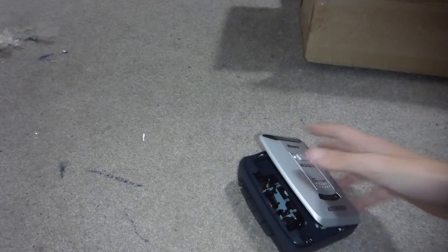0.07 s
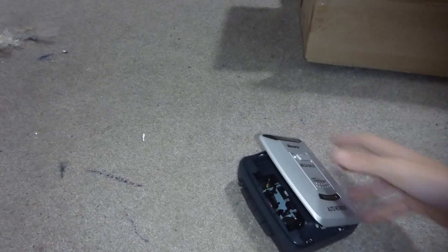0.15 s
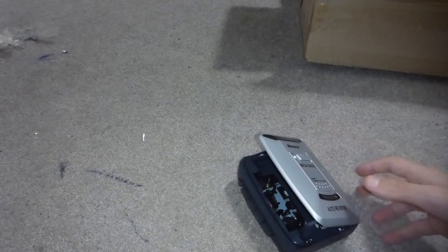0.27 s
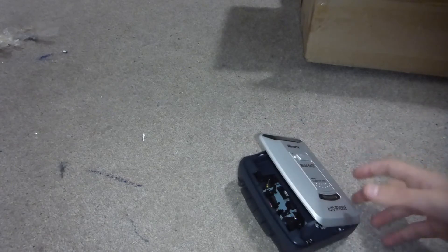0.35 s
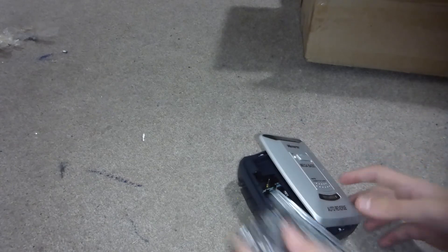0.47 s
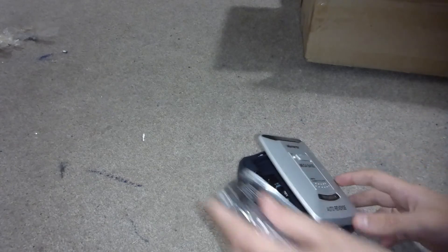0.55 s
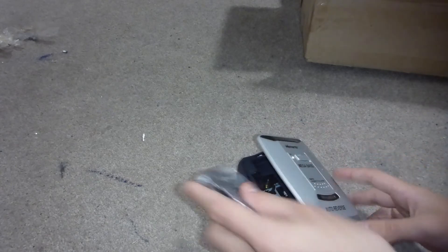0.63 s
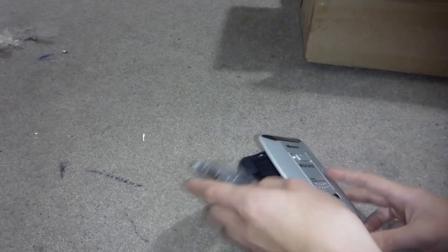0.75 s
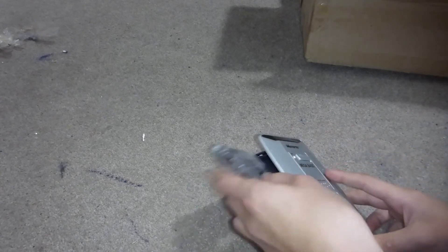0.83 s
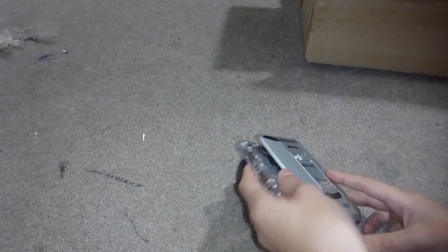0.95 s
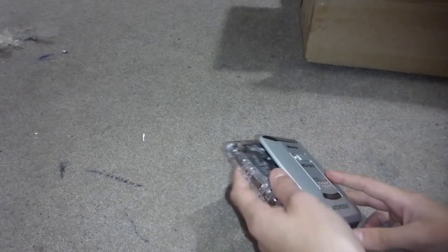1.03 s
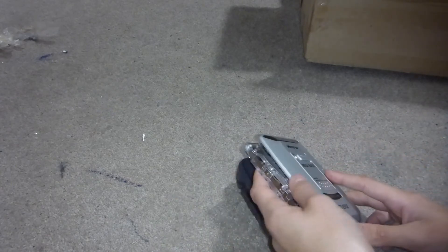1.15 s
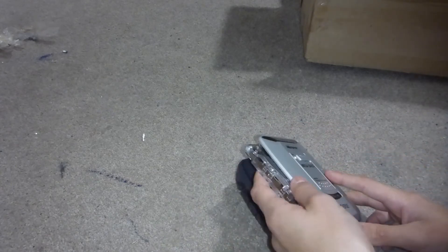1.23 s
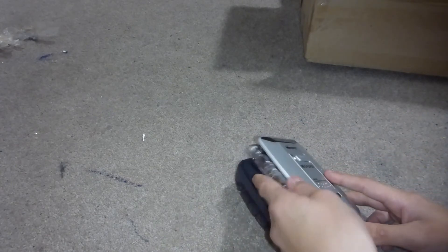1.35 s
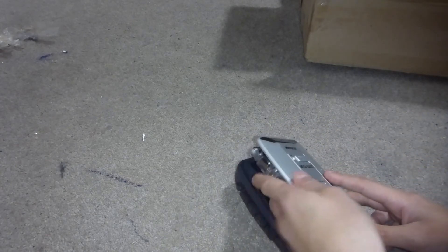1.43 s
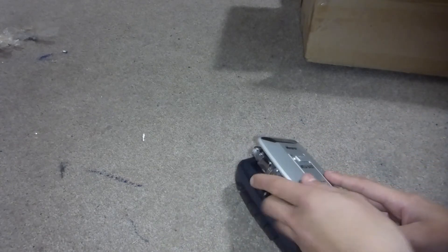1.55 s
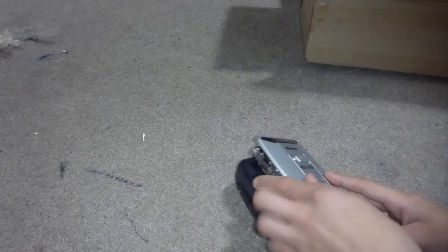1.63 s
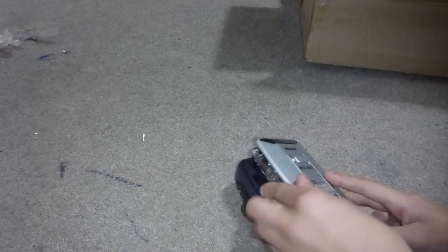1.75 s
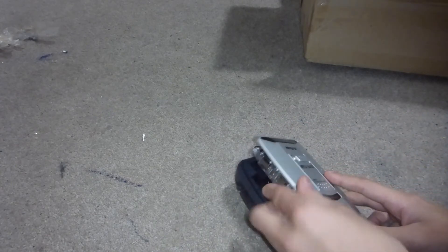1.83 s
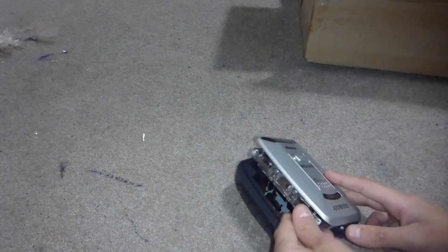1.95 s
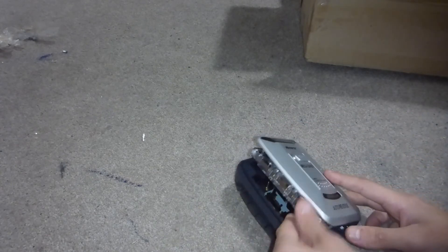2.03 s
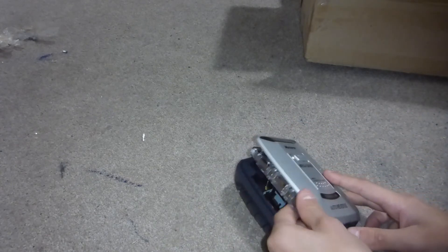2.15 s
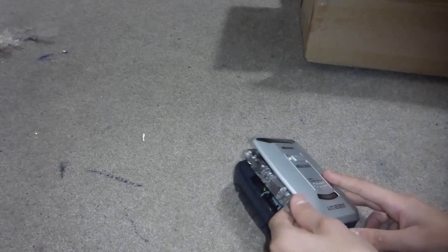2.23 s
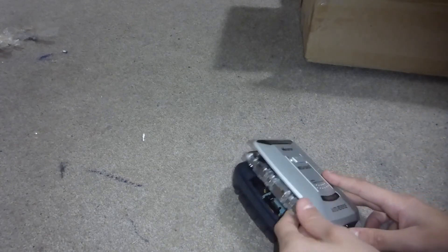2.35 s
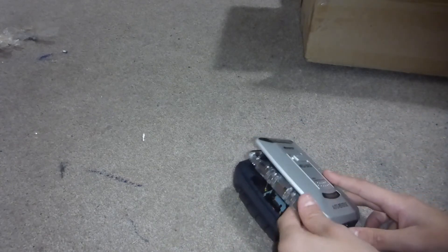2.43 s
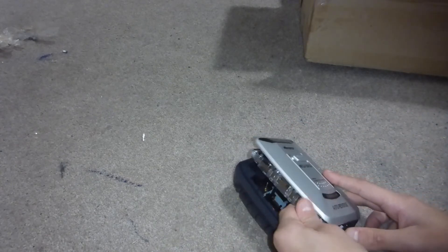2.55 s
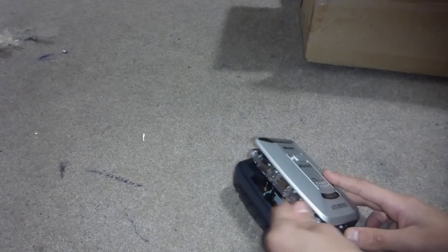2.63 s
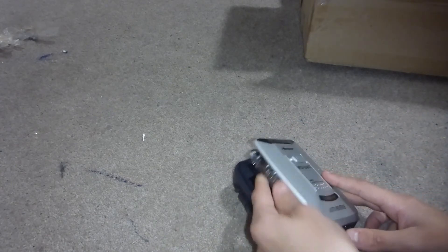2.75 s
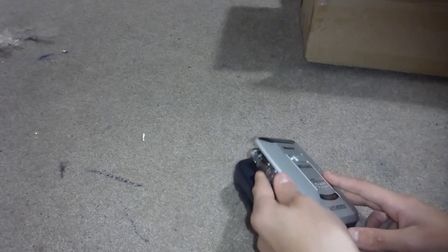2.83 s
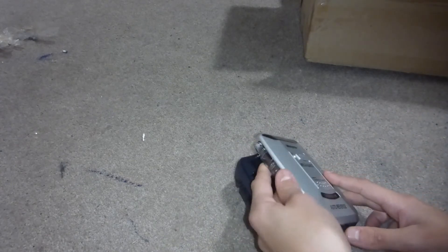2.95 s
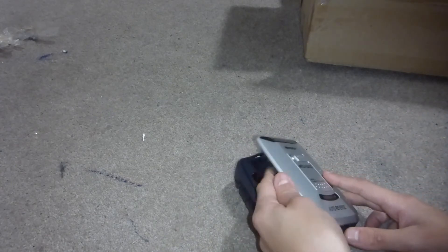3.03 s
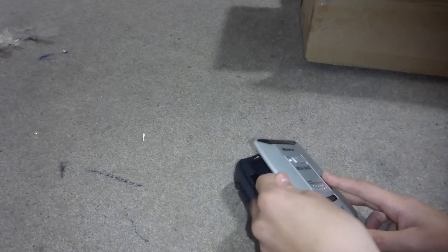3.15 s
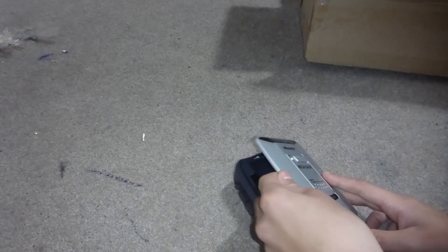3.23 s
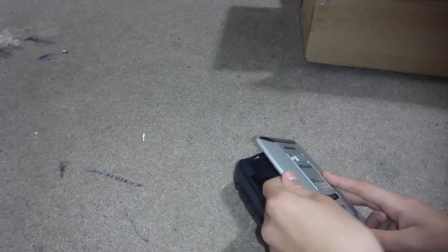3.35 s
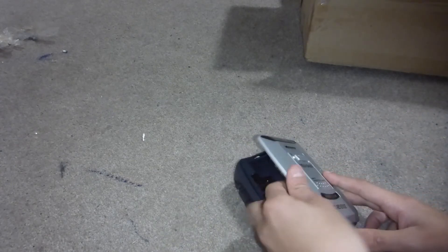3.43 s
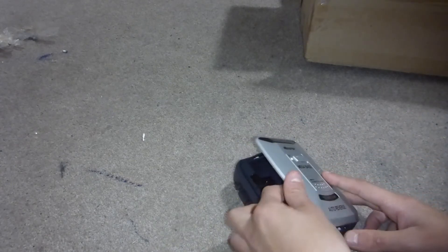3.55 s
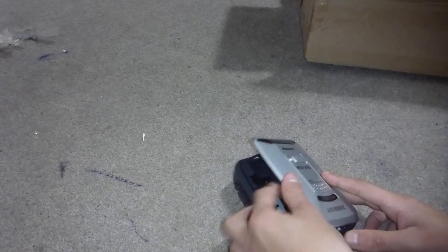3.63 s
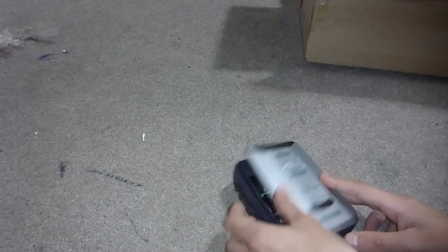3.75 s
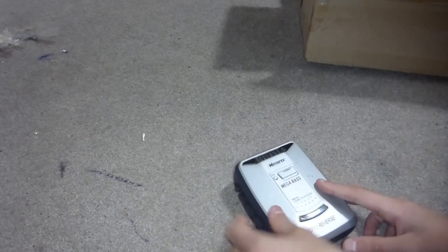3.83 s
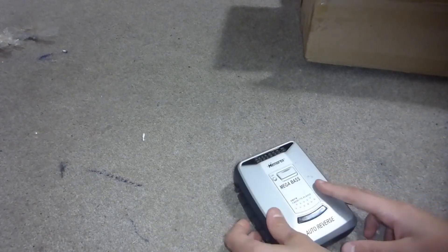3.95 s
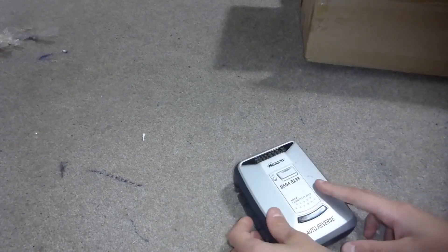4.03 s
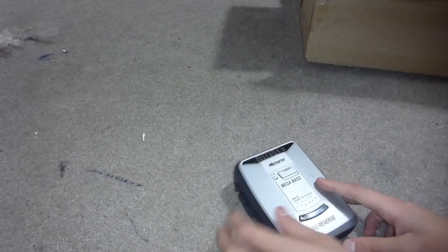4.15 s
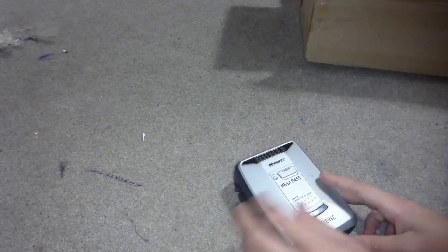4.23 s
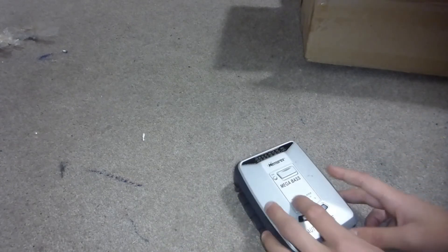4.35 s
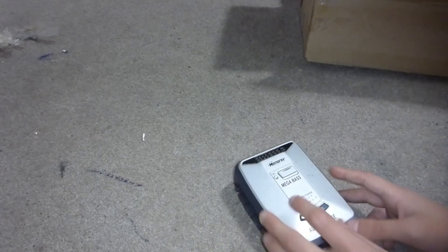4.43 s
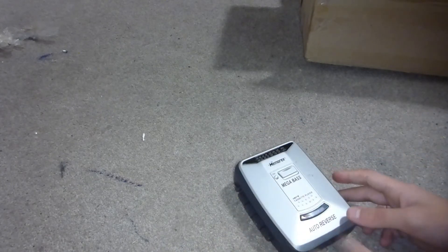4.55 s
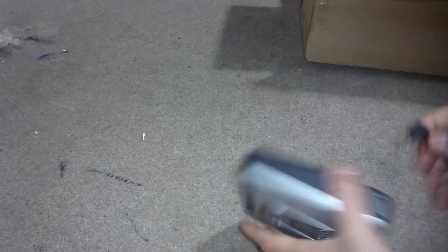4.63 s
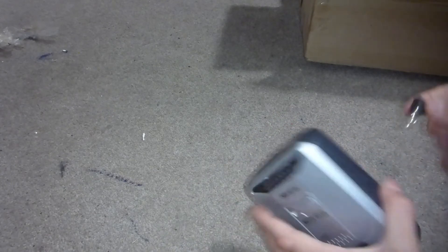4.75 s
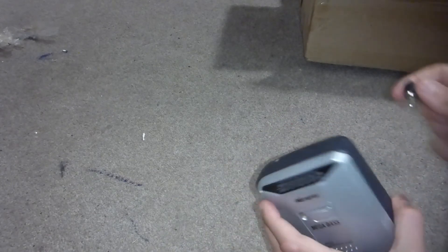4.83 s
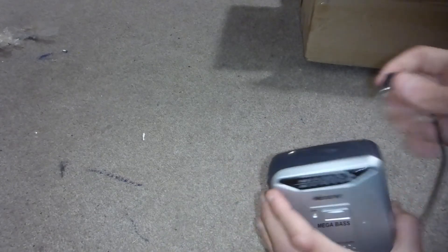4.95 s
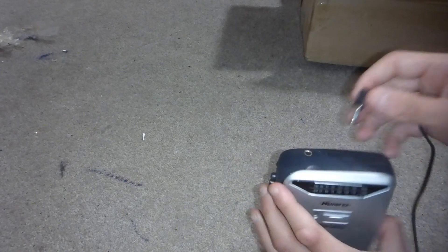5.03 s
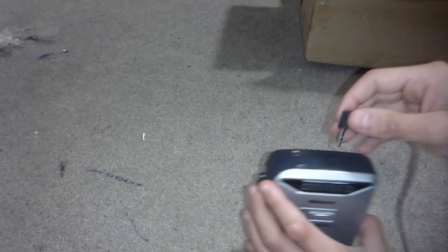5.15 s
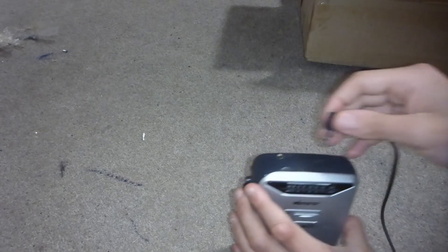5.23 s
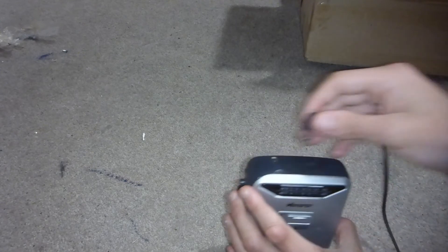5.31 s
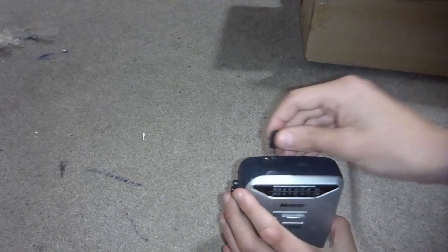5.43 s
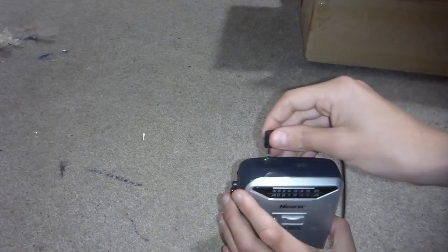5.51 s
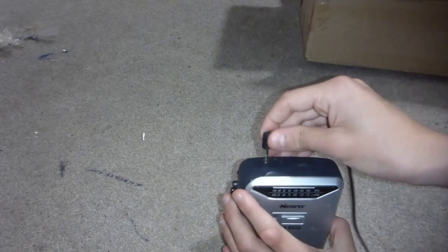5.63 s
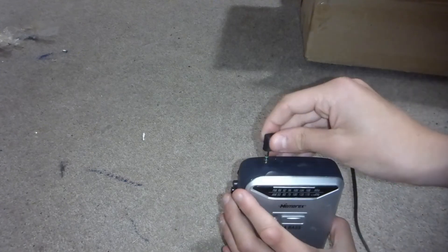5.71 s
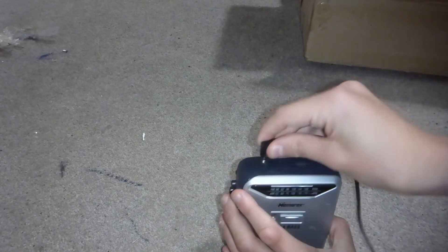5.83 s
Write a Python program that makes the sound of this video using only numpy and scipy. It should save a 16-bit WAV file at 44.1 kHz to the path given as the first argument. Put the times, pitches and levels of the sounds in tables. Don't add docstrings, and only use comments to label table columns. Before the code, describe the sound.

A hollow plastic gadget knocks, rattles and snaps close up in a small quiet room, ending with small sharp plug clicks.

```python
import sys
import numpy as np
from scipy import signal
from scipy.fft import rfft, irfft, next_fast_len
from scipy.io import wavfile
from scipy.ndimage import uniform_filter1d

SR = 44100
rng = np.random.default_rng(int(sys.argv[2]) if len(sys.argv) > 2 else 0)


def transcribe(u):
    v = np.clip(np.atleast_2d(u).T, -1, 1)
    q = np.round(v * 32767).astype(np.int16)
    wavfile.write(sys.argv[1], SR, q)


def rack_gain(trim_db):
    fader = np.asarray(trim_db, float)
    return 10 ** (fader / 20)


N = 259087


def evened(x):
    return x / np.sqrt(np.mean(x ** 2) + 1e-20)


def peaked(x):
    return x / abs(x).max()


def read(points, hz):
    f, value = np.transpose(points)
    return np.interp(np.log(hz + 1), np.log(f + 1), value)


def causal(gain_db_of, size=4096):
    gain_db = gain_db_of(abs(np.fft.fftfreq(size, 1 / SR)))
    log_gain = np.log(rack_gain(np.maximum(gain_db, -100)))
    return np.fft.ifft(np.exp(np.conj(signal.hilbert(log_gain)))).real[:size // 2]


def add(mix, s, sound):
    part = mix[round(s * SR):][:len(sound)]
    part += sound[:len(part)]


def ring(modes, t, luck, damping):
    hz, db, t60 = np.transpose(modes)[:, :, None]
    fading = rack_gain(db - 60 * t / (t60 * damping))
    return (luck[:, None] * fading * np.sin(2 * np.pi * hz * t)).sum(0)


def noise(points, same, lead=lambda hz: 0 * hz):
    frames, hz = N // 256 + 5, np.fft.rfftfreq(1024, 1 / SR)
    a, b, c, d, patches = rng.standard_normal((frames, 513, 5)).T
    patches = evened(uniform_filter1d(uniform_filter1d(patches, 14, 0), 10, 1))
    same = np.clip(same(hz), -1, 1)[:, None]
    late = np.exp(-1j * lead(hz))[:, None]
    left, other = a + 1j * b, c + 1j * d
    right = same * late * left + np.sqrt(1 - same ** 2) * other
    z = np.array([left, right]) * rack_gain(read(points, hz)[:, None] + 2.5 * patches)
    return evened(signal.istft(z, nperseg=1024, noverlap=768)[1][:, :N])


def camera_floor():
    # f/Hz, level/dB per Hz
    colour = [(25, -21), (140, -1), (430, -5), (1000, -3), (2100, -11.5), (4700, -20), (5800, -19),
              (7000, -30), (8600, -29), (9050, -55.5), (9600, -27), (14900, -37.5), (15500, -60.5)]
    # f/Hz, likeness (0 to 1)
    likeness = [(60, 0.3), (400, 0.4), (1200, 0.8), (2600, 0.35), (5600, .7), (9000, 0.45)]
    # f/Hz, lead/radians
    left_lead = [(330, -.2), (560, -3), (2000, -3.2), (2900, -5.3), (3600, -6.1), (15900, -6.2)]
    return rack_gain(-58) * noise(colour, lambda hz: read(likeness, hz), lambda hz: read(left_lead, hz))


def room(x):
    # f/Hz, time to fall by 60 dB/s
    echo_time = [(200, 0.34), (600, 0.13), (1700, 0.18), (4500, 0.16), (10000, 0.18)]
    turn, out = np.cumsum(np.ones(N)) * 2.3 / SR, 0
    for k in range(3):
        taps = np.zeros((3, SR // 2))
        at = np.arange(120, SR // 2 - 20, 20) + rng.integers(0, 20, (3, (SR // 2 - 121) // 20))
        np.put_along_axis(taps, at, rng.choice([-1., 1.], at.shape), 1)
        hz, t, z = signal.stft(taps[:1] + 0.9 * taps[1:], SR, nperseg=256)
        fading = rack_gain(-60 * t / read(echo_time, hz)[:, None])
        tail = signal.istft(z * fading, SR, nperseg=256)[1]
        tail = tail / np.linalg.norm(tail[0])
        share = np.sqrt(2 / 3) * np.cos(np.pi * (turn + k / 3))
        out = out + signal.fftconvolve((x * share)[None], tail, axes=1)[:, :N]
    return out


def rubbing():
    # t/s, level/dB
    pressure = [(0, -60), (.28, -54), (.7, -62), (1.22, -48), (1.5, -70), (1.75, -62.5), (2.5, -68),
                (3.14, -56), (3.36, -69.5), (3.5, -58.5), (3.62, -73), (3.76, -57), (4.05, -74),
                (4.95, -64), (5.33, -71), (5.46, -54.5), (5.63, -72), (5.87, -63.5)]
    # f/Hz, level/dB
    rustle_colour = [(100, -24), (300, 2.5), (1000, 1), (3000, -1), (6000, -11.5), (8000, -22)]
    # t at the loudest/s, half length/s, level/dB
    glides = [
        (.4, .1, -73),
        (0.73, 0.054, -61.5),
        (1.14, 0.095, -68),
        (1.908, 0.2, -62.5),
        (2.78, .07, -88),
        (3.083, 0.14, -56),
    ]
    t = np.arange(N) / SR
    level_db = np.interp(t, *np.transpose(pressure))
    glide = sum(rack_gain(db) * np.exp(-((t - s) / half) ** 2) for s, half, db in glides)
    grain = rack_gain(2.0 * evened(uniform_filter1d(rng.standard_normal(N), 150)))
    rustle = noise(rustle_colour, lambda hz: 0.34 + 0 * hz) * grain * rack_gain(level_db)
    fizz = noise([(8000, -23.5), (9000, -9.5), (16000, -2.5)], lambda hz: .6 + 0 * hz)
    skin = rack_gain(-84.5 + .3 * (level_db + 59.0))
    return rustle + fizz * grain * (skin + glide)


def scrapes(rows):
    out = np.zeros(N)
    for s, half, db, hz in rows:
        t = np.arange(-.15, .15, 1 / SR)
        odds, size, fine = rng.random((3, len(t)))
        slip_now = odds < 4500 / SR
        slips = slip_now * rack_gain(-2.6 * np.log(size + 1e-4)) * np.sign(fine - .5)
        patch = signal.butter(1, [hz * 0.21, hz * 0.81], "band", fs=SR, output="sos")
        rung = evened(signal.sosfilt(patch, slips))
        add(out, s - .15, rack_gain(db) * rung * np.exp(-(t / half) ** 2))
    return out


def thuds():
    # t/s, peak level/dB
    pushes = [(0.838, -44), (1.038, -50), (1.165, -41.5), (1.44, -67.5), (2.007, -43), (2.266, -34.5),
              (2.51, -43), (2.954, -33.5), (3.035, -45), (3.176, -42.5), (3.844, -35.5), (3.866, -35.5),
              (4.375, -50), (5.853, -45.5)]
    # f/Hz, level/dB, time to fall by 60 dB/s
    low_modes = [(55, 3.5, 0.04), (168, 4, 0.046), (248, -2.5, 0.077)]
    t, out = np.arange(5000) / SR, np.zeros(N)
    for s, db in pushes:
        luck = 1 + 0.37 * rng.standard_normal(len(low_modes))
        push = ring(low_modes, t, luck, 0.63) * (1 - np.exp(-t / 0.0033))
        add(out, s, rack_gain(db) * peaked(push))
    return out


def ticks():
    # t/s, peak level/dB
    rattles = [(.3017, -42), (.3136, -52), (.3331, -39.5), (.5157, -23), (.8385, -31.5), (.9757, -29),
               (1.043, -26), (1.0934, -36), (1.1143, -53.5), (1.17, -13.5), (1.6072, -43), (2.2672, -25),
               (2.83, -38), (2.9527, -24), (2.974, -25.5), (3.041, -27.5), (3.8102, -38), (3.8421, -20)]
    # t/s, peak level/dB
    settling = [(.1336, -45.5), (.4478, -40.5), (.6719, -43), (1.208, -13.5), (1.4405, -11), (2.0053, -40),
                (2.0118, -39), (2.581, -34), (2.7307, -29), (2.7447, -24.5), (2.826, -28.5), (2.9517, -67),
                (3.1108, -45.5), (3.6941, -50.5), (3.7943, -51.5), (4.38, -64), (5.4909, -40),
                (5.5757, -52), (5.6999, -40), (5.8541, -46)]
    # t/s, peak level/dB
    snicks = [
        (1.1608, -9),
        (1.2466, -29.5),
        (1.3114, -22.5),
        (1.4277, -56),
        (2.2094, -33.5),
        (2.3171, -24),
        (2.331, -32),
        (2.5075, -30),
        (2.5113, -17),
        (2.52, -19),
    ]
    t, out = np.arange(5000) / SR, np.zeros(N)
    parts = [(rattles, 0.075), (settling, 0.044), (snicks, 0.027)]
    for s, db, t60 in sorted((*row, t60) for rows, t60 in parts for row in rows):
        burst = rng.standard_normal(len(t)) * rack_gain(db - 60 * t / np.clip(t60, .005, .2))
        add(out, s - .0007, burst * np.minimum(t / 0.0024, 1))
    return signal.sosfilt(signal.butter(4, 8200, "high", fs=SR, output="sos"), out)


def plates():
    # t/s, peak level/dB, f/Hz
    small_plates = [(0.3233, -38, 2030), (0.336, -30, 3420), (0.522, -29, 800), (0.367, -32.5, 1850),
                    (0.4131, -28.5, 2710), (0.481, -35, 2900), (0.4805, -29, 1790), (0.522, -12, 1400),
                    (0.5358, -25, 1500), (0.5436, -31, 2020), (0.5455, -25, 1440), (0.6302, -47, 2770),
                    (0.6688, -40.5, 3360), (0.6688, -39.5, 1440), (0.968, -19, 1480), (1.039, -31.5, 5250),
                    (1.0375, -31, 6250), (1.0394, -21, 2850), (1.0533, -29, 5080), (1.054, -28.5, 5460),
                    (1.053, -26.5, 2430), (1.0763, -28, 1550), (1.207, -28, 900), (1.0977, -40, 2100),
                    (1.1471, -31, 2580), (1.1475, -25, 1390), (1.16, -31, 4200), (1.169, -18, 950),
                    (1.168, -14, 1800), (1.169, -12.5, 1400), (1.205, -31, 6080), (1.2447, -35, 1810),
                    (1.2442, -32, 2910), (1.3092, -24.5, 3140), (1.4348, -36, 3850), (1.4352, -24, 3430),
                    (1.445, -29, 3900), (1.438, -20, 1000), (1.4485, -27, 1080), (1.468, -26, 1200),
                    (1.4815, -31, 1200), (1.487, -31, 1270), (1.503, -36, 1250), (1.51, -35, 1300),
                    (1.4613, -22.5, 2830), (1.4622, -19, 1230), (1.6085, -41, 3390), (1.666, -38, 2760),
                    (1.31, -25, 780), (1.9944, -36.5, 2040), (2.258, -43, 930), (2.2562, -39.5, 3330),
                    (2.2669, -19, 3550), (2.2668, -24.5, 4020), (2.2685, -12.5, 1090),
                    (2.5107, -47, 6200), (2.5763, -34, 3750), (2.746, -41, 2360), (2.7459, -33, 6500),
                   (2.7459, -28, 3195), (3.0415, -29, 1150), (2.8176, -38, 3550), (2.8176, -33, 2990),
                   (2.9531, -24.5, 880), (2.953, -20, 1480), (2.9543, -11.5, 3900), (2.512, -39, 720),
                   (2.9749, -44, 3420), (2.9749, -37, 3800), (3.883, -27, 700), (3.0655, -30, 4050),
                   (3.04, -26, 3230), (3.041, -32, 3930), (3.04, -29, 3650), (3.065, -33.5, 5370),
                   (2.5765, -40, 730), (3.1109, -40, 2250), (3.1763, -39.5, 1000), (3.7946, -31, 4320),
                   (3.845, -16.5, 2470), (3.846, -20, 3840), (3.845, -11, 888), (3.864, -26, 3380),
                   (3.8652, -25, 4510), (3.8638, -18.5, 3940), (3.906, -38, 4520), (3.9067, -28.5, 6050),
                   (3.907, -33, 5490), (4.3799, -35, 2396), (4.3795, -24.5, 3590), (4.6252, -36.5, 3360),
                   (4.6258, -30.5, 3030), (4.6261, -27, 2590), (4.841, -45, 4370), (4.841, -47, 3380),
                   (5.0947, -39.5, 848), (3.8685, -17, 1400), (5.3713, -43, 1600), (5.3714, -43.5, 3720),
                   (5.4922, -28.5, 1714), (5.4923, -35, 3290), (5.4916, -30, 2230), (5.493, -38, 720),
                   (5.5779, -33, 1730), (5.664, -40, 1770), (5.663, -35, 2210), (5.665, -39, 960),
                   (5.7015, -36, 1940), (5.7012, -41, 2440), (5.7015, -35, 2940), (5.8542, -29.5, 1980),
                   (5.8545, -29.5, 3670)]
    # t/s, peak level/dB, f/Hz
    snaps = [(.4131, -29, 2300), (.5206, -11, 1800), (.8392, -19, 5700), (.8392, -25, 4010),
             (.8392, -33, 3040), (.8395, -21, 1450), (.855, -40, 5500), (1.1608, -5.5, 1400),
             (1.1692, -10, 2200), (1.208, -18, 1600), (1.3092, -24, 2290), (2.9536, -17, 5680),
             (3.0455, -25, 480), (3.066, -25, 1050), (3.871, -21, 1100), (4.3795, -27, 4410),
             (2.9536, -17, 3830), (3.0425, -30, 3600), (4.6265, -32, 2250), (4.6262, -25, 3050),
             (4.6262, -31, 1920), (5.4925, -32, 1000), (5.4918, -24, 10500), (5.578, -31, 10600),
             (5.8505, -34, 3000), (5.695, -35, 2400), (5.7085, -40, 5000), (5.861, -30, 3600)]
    # t/s, peak level/dB
    tongue = [
        (2.3171, -36),
        (2.331, -40),
        (2.5075, -30),
        (2.5122, -19),
        (2.5208, -21),
        (2.5275, -31),
        (2.532, -36),
        (2.5365, -48),
    ]
    t, out = np.arange(3000) / SR, np.zeros(N)
    pings = [(*row, 9790) for row in tongue]
    kinds = [(small_plates, .02), (snaps, .008), (pings, .018)]
    for rows, t60 in kinds:
        for s, db, hz in rows:
            pair = ring([(hz, 0, 1), (hz * 1.05, -14, 1.5)], t, np.ones(2), t60 * (2000 / hz) ** .25)
            add(out, s - .0008, rack_gain(db) * pair * np.minimum(t / .001, 1))
    return out


def knocks():
    # f/Hz, level/dB, time to fall by 60 dB/s
    hollow_modes = [(328, -12, .08), (418, -3, .095), (484, -1.5, .095), (540, 0, .06)]
    # f/Hz, level/dB, time to fall by 60 dB/s
    wall_modes = [(720, 12.5, 0.0077), (980, 5.5, 0.041), (1070, -6.5, 0.02), (1390, 1.5, 0.051),
                  (1894, -0.5, 0.05), (2060, -1.5, 0.026), (3040, -2, 0.063), (3510, -9.5, 0.11),
                  (5296, -11, 0.0051), (5806, -7.5, 0.017)]
    # f/Hz, level/dB
    crack_colour = [(500, -30.5), (1300, -7), (2500, 2.5), (4000, -1), (6500, -11), (10000, -18),
                    (16000, -15)]
    # t/s, peak level/dB, panel f/Hz, hollow shell level against the peak/dB, time to fall by 60 dB/s
    edge_blows = [(0.335, -27.5, 1350, -28, 0.032), (0.5353, -28, 1950, -14, 0.03),
                  (0.5433, -23, 1450, -14, 0.0098), (0.9656, -13, 1000, -16, 0.024),
                  (1.0385, -15.5, 950, -5, 0.074), (1.0533, -18, 954, -6, 0.052),
                  (1.0977, -23.5, 1390, -24, 0.036), (1.16, -11.5, 1420, -17, 0.052),
                  (1.169, -2.5, 1460, -12, 0.017), (1.206, -12, 1400, -4, 0.026),
                  (1.4351, -15, 1010, -9.5, 0.066), (2.2668, -9.5, 2000, -5, 0.031),
                  (2.576, -21, 1016, -9, 0.014), (2.7464, -27.5, 3080, -4.5, 0.041),
                  (2.8176, -23.5, 1070, -6, 0.027), (3.04, -24, 1300, -0.5, 0.038),
                  (3.707, -24, 970, -4, 0.025), (3.8657, -5.5, 900, -4, 0.025),
                  (4.3795, -16.5, 846, 0, 0.022), (2.9534, -1.5, 3100, -20, 0.0087),
                  (5.4916, -17, 3600, -18, 0.014), (5.5777, -24.5, 3040, -15.5, 0.028),
                  (5.8545, -21.5, 3580, -11, 0.017), (5.86, -26, 2050, -3, 0.051)]
    # (t/s, level/dB, f/Hz, hollow level/dB, fall time/s)
    flat_blows = [(.366, -27, 2790, -20, .038), (0.414, -30.5, 1760, -32, 0.075),
                  (0.4805, -24, 1380, -18, 0.03), (0.5203, -7, 2100, -30, 0.012),
                  (0.8393, -11.5, 900, -5.5, 0.035), (1.0769, -15.5, 3590, -14, 0.021),
                  (1.1453, -27.5, 1036, -13, 0.076), (1.3091, -11.5, 1026, -12, 0.034),
                  (1.461, -17, 1400, -33, 0.03), (2.5106, -25.5, 2900, -1.5, 0.026),
                  (4.629, -23, 952, -12.5, 0.022), (3.065, -24, 3870, -7, 0.02),
                  (3.7949, -29, 1400, 3, 0.026), (3.846, 0, 1335, -7.5, 0.013),
                  (3.9072, -26, 1335, -8, 0.037)]
    # t/s, peak level/dB, panel f/Hz, hollow shell level/dB
    tape_taps = [(0.3237, -28, 1380, -7.5), (0.473, -35.5, 1920, -26), (0.6702, -38.5, 3340, -35),
                 (1.2438, -29, 1390, -17), (1.426, -22.5, 1100, -10.5), (1.4473, -31.5, 1100, -18),
                 (1.608, -33, 2530, -19), (1.9092, -44, 1080, 0), (1.9944, -34, 1990, 0.5),
                 (2.007, -33.5, 960, -9.5), (2.041, -34.5, 1124, -1.5), (2.2075, -35.5, 1020, -3.5),
                 (2.2562, -34, 3300, -18), (2.4584, -40, 2830, -7), (2.4973, -47, 1150, -5),
                 (2.519, -30, 1150, -14), (3.1111, -29.5, 1360, -1.5), (3.1772, -31, 1350, -9),
                 (3.212, -35.5, 970, 0)]
    # t/s, peak level/dB, panel f/Hz, hollow shell level/dB
    case_taps = [(3.4289, -39, 1040, -26), (3.5111, -38, 910, 0), (3.633, -50, 935, -9.5),
                 (3.9268, -30, 2380, -1.5), (4.574, -42, 1870, -7.5), (4.77, -39.5, 750, -1.5),
                 (4.826, -45, 1005, 0), (4.841, -34, 880, 3.5), (5.0947, -32.5, 940, -7),
                 (5.3714, -35.5, 2220, -7), (5.663, -31.5, 934, -10), (5.7012, -30, 2950, -9),
                 (5.7264, -31.5, 2060, -7.5)]
    # t/s, peak level/dB, panel f/Hz, hollow shell level/dB
    bumps = [(0.5585, -36, 1900, -9), (0.6306, -38.5, 1500, -21), (0.9334, -56, 520, 5),
             (.951, -29.5, 1530, 4.5), (1.2865, -42, 590, -10), (1.4637, -27, 1130, -31),
             (1.4785, -35, 1200, -20), (1.6674, -31, 3510, -13.5), (2.1345, -48.5, 2640, -9),
             (2.9648, -36, 2980, 0), (2.9738, -36, 3660, -0.5), (3.025, -42.5, 536, 1),
             (3.2763, -34, 988, -8.5), (3.4815, -40, 1385, 2.5), (3.6944, -35, 1126, -4.5),
             (4.2562, -49, 900, -14), (4.3906, -36, 900, 3), (4.738, -48.5, 886, -2),
             (4.8536, -46, 1715, -13), (4.926, -52, 950, 8), (4.97, -49.5, 1680, 0), (5.427, -45, 530, 0),
             (5.671, -35.5, 2130, -24)]
    t, out = np.arange(5000) / SR, np.zeros(N)
    blows = [(*row, -3) for row in edge_blows] + [(*row, -9.5) for row in flat_blows]
    blows += [(*row, 0.036, -3) for row in tape_taps]
    blows += [(*row, 0.027, -3.5) for row in case_taps]
    blows += [(*row, 0.07, -12) for row in bumps]
    for s, db, hz, hollow_db, t60, crack_db in sorted(blows):
        luck = rng.standard_normal(len(wall_modes + hollow_modes) + 1)
        grit = rng.standard_normal((2, len(t)))
        t60 = np.clip(t60, .006, .2)
        grip = t * (1 + 0.022 * luck[-1])

        swing = [(hz, 0, .35), (hz * 1.04, -9, 1.1), (hz * 1.1, -23, 2.6)]
        panel = ring(swing, t, np.ones(3), t60 * (1200 / hz) ** 0.089)

        near = rack_gain(-7.0 * abs(np.log2(np.transpose(wall_modes)[0] / hz)))
        wall_luck = (np.sign(luck) + 0.89 * luck)[:len(wall_modes)]
        walls = peaked(ring(wall_modes, grip, near * wall_luck, t60 / 0.044))

        hollow_luck = 1 + luck[len(wall_modes):-1] / 4
        hollow = peaked(ring(hollow_modes, grip, hollow_luck, .8 * t60 / .035))
        hollow *= 1 - np.exp(-t / 0.0017)

        chatter = rack_gain(2.0 * evened(uniform_filter1d(grit[1], 60)) - 6.0 - 60 * t / (1.54 * t60))
        burst = grit[0] * (rack_gain(-60 * t / (0.72 * t60)) + chatter)
        burst[50] += 6 * np.sign(luck[0])
        brighter = (1300 / hz) ** 0.16
        crack_taps = causal(lambda f: read(crack_colour, f * brighter), size=1024)
        crack = peaked(signal.fftconvolve(burst, crack_taps)[:len(t)])

        pitched = np.clip(1 - 0.38 * rack_gain(crack_db), .2, 1)
        blow = pitched * (0.67 * panel + 0.5 * walls) + rack_gain(hollow_db) * hollow + rack_gain(crack_db) * crack
        lead_in = crack * np.minimum(t / .003, 1)
        add(out, s - .004, rack_gain(db - 22) * lead_in)
        add(out, s - .0005, rack_gain(db) * blow * np.minimum(t / 0.00091, 1) ** 1.52)
    return out


def scene():
    # t at the loudest/s, half length/s, level/dB, upper reference f/Hz (the band
    catches = [(0.518, 0.012, -42.5, 2980), (0.952, 0.0037, -44, 1500), (1.053, 0.01, -26, 2790),
               (1.436, 0.02, -37.5, 1790), (1.674, 0.049, -54.5, 3420), (2.708, 0.028, -57, 3490),
               (2.971, 0.015, -41, 4500), (3.044, 0.0047, -40, 3650), (1.189, .03, -35.5, 2600),
               (3.058, 0.02, -49, 6000), (3.846, 0.0048, -21, 3263), (4.643, 0.015, -51.5, 3600),
               (5.184, 0.016, -61.5, 2400), (5.415, 0.064, -60.5, 2200), (5.701, 0.0096, -43, 3960)]
    # t at the loudest/s, half length/s, level/dB, upper #
    # reference f/Hz (the band runs from 0.21 to 0.81 of it)
    drags = [(.545, .025, -45, 2600), (.86, 0.019, -46, 6500), (1.08, .025, -42.5, 5000),
             (1.225, 0.029, -43, 5500), (1.49, 0.028, -45.5, 1490), (2.947, .005, -44, 3490),
             (3.81, .018, -47, 4000), (3.89, 0.032, -38.5, 6000), (4.39, 0.013, -47, 5500),
             (5.51, 0.019, -55.5, 5000), (5.59, .015, -53.5, 4000)]
    player = knocks() + thuds() + scrapes(catches) + ticks() + plates()
    return player + rack_gain(-8) * room(player) + rubbing() + scrapes(drags)


def low_pass(x):
    return signal.sosfilt(signal.butter(12, 16340, fs=SR, output="sos"), x)


def record(dry):
    # f/Hz, level/dB
    port = [(30, -22), (120, 1.5), (300, 2.5), (6200, 1.5), (7600, -12.5), (9000, -20), (9450, -8.5),
            (9760, 8), (10050, 6.5), (11500, -11), (13100, -28.5), (13900, -12.5), (14500, -28),
            (16300, -56.5)]
    # f/Hz, level/dB
    left_db = [(60, -0.5), (240, 0.5), (950, -4), (3770, -3), (15000, -2)]
    # f/Hz, lead/radians
    port_lead = [(0, -0.23), (2150, 0.5), (4220, 0.33), (8700, 0.19), (10100, -0.86), (15900, 0)]
    left = causal(lambda hz: read(port, hz) + read(left_db, hz) / 2)
    right = causal(lambda hz: read(port, hz) - read(left_db, hz) / 2)
    heard = signal.oaconvolve(dry, np.array([left, right]), axes=1)[:, :N]
    size = next_fast_len(N)
    lead = read(port_lead, np.fft.rfftfreq(size, 1 / SR)) * np.array([[.5j], [-.5j]])
    heard = irfft(rfft(heard, size) * np.exp(lead), size)[:, :N]
    heard += camera_floor()
    return low_pass(np.clip(heard, -.96, .96))


dry = scene()
out = record(dry)
transcribe(out)
```